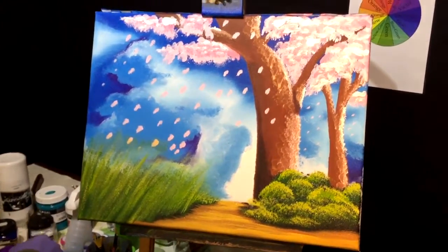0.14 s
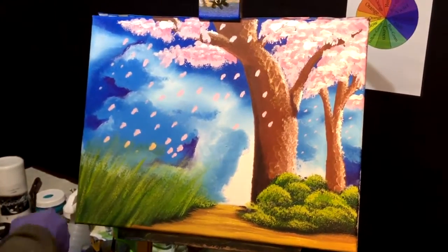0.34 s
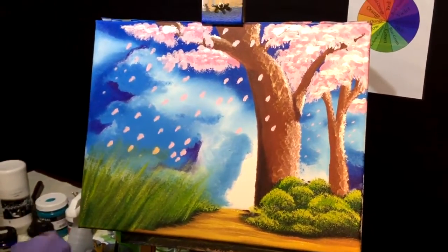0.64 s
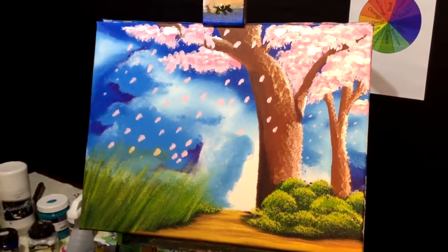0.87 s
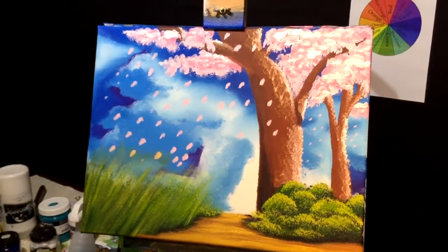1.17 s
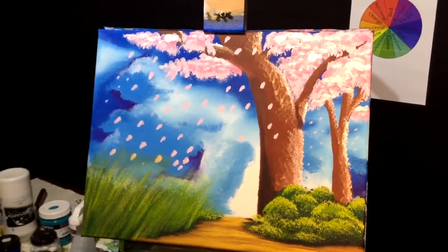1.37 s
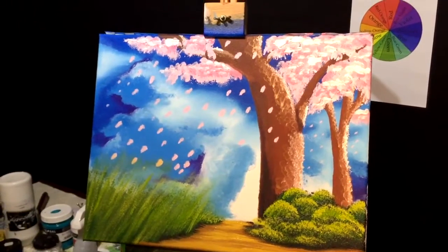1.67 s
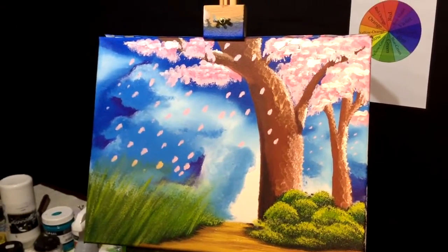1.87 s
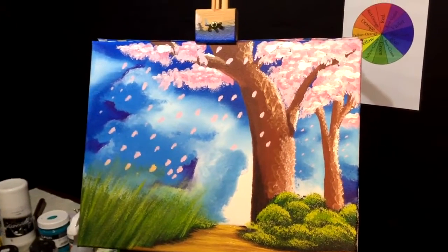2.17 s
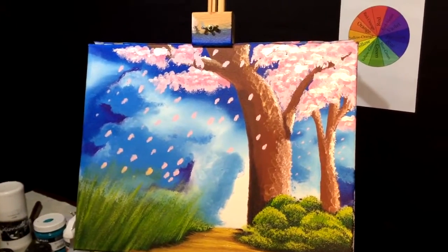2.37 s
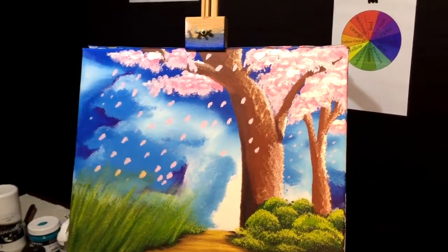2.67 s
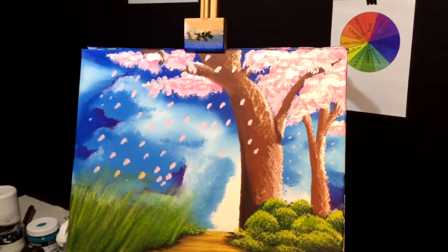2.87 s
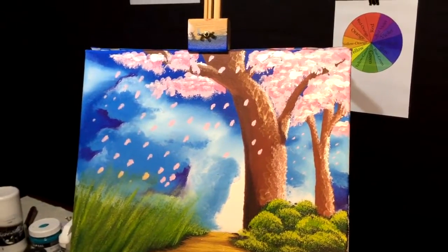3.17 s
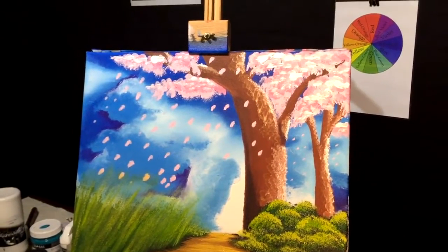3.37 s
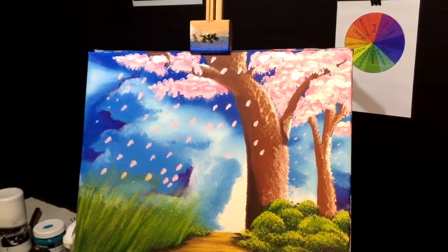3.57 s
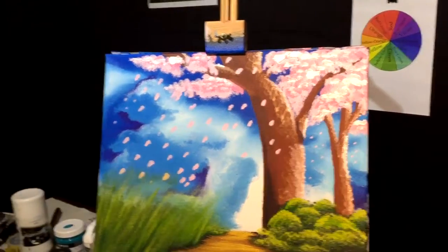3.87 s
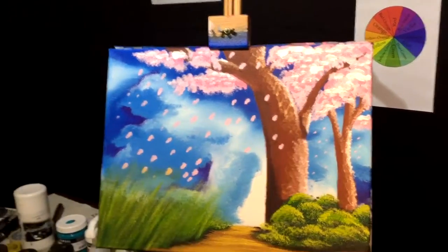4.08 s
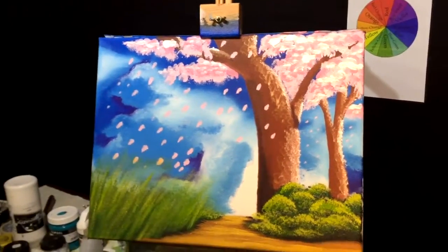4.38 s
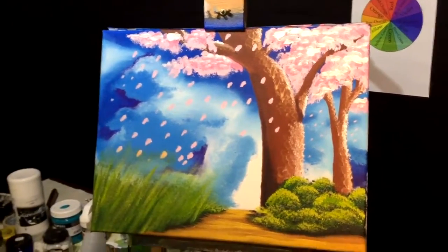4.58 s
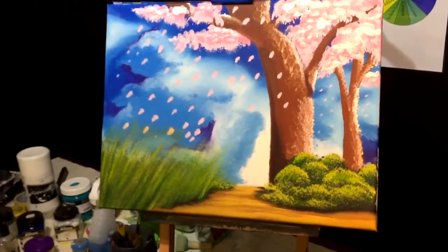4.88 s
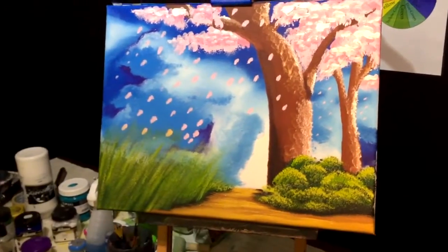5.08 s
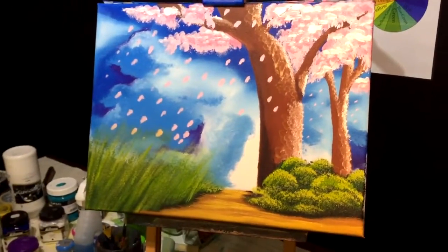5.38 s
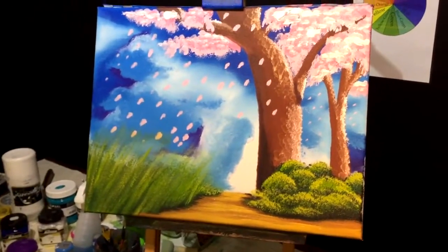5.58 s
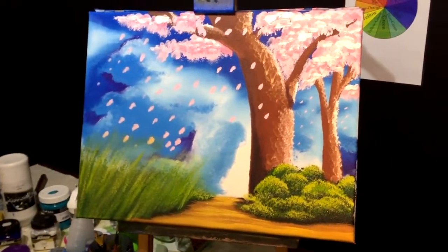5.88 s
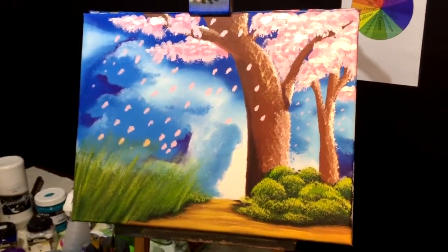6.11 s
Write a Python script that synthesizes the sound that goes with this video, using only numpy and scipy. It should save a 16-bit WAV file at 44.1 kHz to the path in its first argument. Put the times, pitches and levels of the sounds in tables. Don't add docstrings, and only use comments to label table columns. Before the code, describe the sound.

Brush rinsed in a small jar with light clinks, bubbling plops and quick swishes, two sharp woody knocks, then dull objects set down indoors.

```python
import sys
import numpy as np
from scipy import signal
from scipy.fft import rfft, irfft
from scipy.io import wavfile
from scipy.ndimage import uniform_filter1d, minimum_filter1d

SR = 44100
rng = np.random.default_rng(int(sys.argv[2]) if len(sys.argv) > 2 else 0)


def store_pcm(level_fs):
    pcm = np.round(np.clip(level_fs, -1, 1) * 32767).astype(np.int16)
    wavfile.write(sys.argv[1], SR, np.atleast_2d(pcm).T)


def gain_from_decibels(decibels):
    exponent = np.asarray(decibels, float) / 20
    return 10 ** exponent


N = 275448


def at_hz(points, hz):
    table_hz, value = np.transpose(points)
    return np.interp(np.log(hz + 1), np.log(table_hz), value)


def add(out, s, sound):
    i = round(s * SR)
    out[i:i + len(sound)] += sound[:N - i]


def coloured(x, spectrum, tilt_db=0):
    hz = np.fft.rfftfreq(8192, 1 / SR)
    level_db = at_hz(spectrum, hz) + tilt_db * np.log2(hz / 1000 + .05)
    cepstrum = irfft(np.log(gain_from_decibels(level_db)))
    cepstrum[1:4096] *= 2
    cepstrum[4097:] = 0
    kernel = irfft(np.exp(rfft(cepstrum)))
    return signal.fftconvolve(x, kernel / np.sqrt(np.sum(kernel ** 2)))[:len(x)]


def ring(clicks, hz, t60):
    r, w = gain_from_decibels(-60 / (t60 * SR)), 2 * np.pi * hz / SR
    return signal.lfilter([0, np.sin(w)], [1, -2 * r * np.cos(w), r * r], clicks + 1e-18)


def blows(events, colour, modes, clatter_db, ring_db, swell_cycles, rise_s, unrest):
    longest_ring_s = .55
    crowded_hz = 700
    in_step_s = 0.033
    out, t = np.zeros(N), np.arange(SR * 3 // 4) / SR
    hz, level_db, t60 = np.transpose(modes)[:, :, None]
    swell = 1 - np.exp(-t * hz / swell_cycles)
    drift = signal.resample(rng.standard_normal((len(modes), 100)), len(t), axis=1)
    beats = 1 + unrest * np.minimum(hz / crowded_hz, 1) * np.minimum(t / in_step_s, 1) * drift
    decay = gain_from_decibels(level_db - 60 * t / np.minimum(t60, longest_ring_s))
    body = np.sum(decay * swell * beats * np.sin(2 * np.pi * hz * t), axis=0)
    noises = rng.standard_normal((len(events), len(t)))
    for (s, db, clatter_t60, tilt_db, struck_db), noise in zip(events, noises):
        shape = gain_from_decibels(db + clatter_db - 60 * t / clatter_t60) * np.minimum(t / rise_s, 1)
        clatter = coloured(shape * noise, colour, tilt_db)
        add(out, s, clatter * np.sqrt(np.sum(shape ** 2) / np.sum(clatter ** 2)))
        add(out, s, gain_from_decibels(db + ring_db + struck_db) * body)
    return out


def blips(events, unrest):
    out, t = np.zeros(N), np.arange(SR // 5) / SR
    noises = rng.standard_normal((len(events), 2, len(t)))
    for (s, db, hz, rise, t60, wobble_hz), noise in zip(events, noises):
        phase = 2 * np.pi * np.cumsum(hz * 2 ** (rise * np.minimum(t / t60, .6))) / SR
        wobble = signal.lfilter(*signal.butter(2, wobble_hz, fs=SR), noise)
        along, across = wobble * unrest * np.sqrt(SR / wobble_hz / 2)
        envelope = gain_from_decibels(db - 60 * t / t60) * np.minimum(t / 0.0038, 1)
        add(out, s, envelope * ((1 + along) * np.sin(phase) + across * np.cos(phase)))
    return out


def pings(events):
    rise_cycles = 1.2
    out, t = np.zeros(N), np.arange(SR // 4) / SR
    for s, db, hz, t60 in events:
        swell = 1 - np.exp(-t * hz / rise_cycles)
        add(out, s, gain_from_decibels(db - 60 * t / t60) * swell * np.sin(2 * np.pi * hz * t))
    return out


# frequency in Hz, level in dB per Hz.
HUSH = [(15, -60.5), (25, -20.5), (86, -1.5), (156, -6.5), (188, -11.5), (379, -12.5), (411, -17),
        (553, -17), (898, -19.5), (1500, -20), (1670, -19.5), (1810, -19), (3550, -23), (15600, -34)]


def room_hush():
    return gain_from_decibels(-67.5) * coloured(rng.standard_normal(N), HUSH)


def fizz(grains_per_s, uneven_db, cycles):
    size = gain_from_decibels(uneven_db * rng.exponential(1, N))
    grains = (rng.random(N) < grains_per_s / SR) * size * rng.choice([-1, 1], N)
    pitches, dealt = np.geomspace(120, 15000, 24), rng.integers(0, 24, N)
    rings = sum(ring(grains * (dealt == k), hz, cycles / hz) * hz for k, hz in enumerate(pitches))
    return rings / rings.std()


# centre in seconds, level in dB rms, half length in seconds, tilt in dB per octave.
STROKES = [(-0.001, -46, 0.056, -7.5), (0.093, -51.5, 0.045, -2.5), (0.198, -51, 0.028, -6.5),
           (0.3, -72.5, 0.21, 12), (0.692, -43.5, 0.011, 1), (1.25, -73, 0.015, -4),
           (1.486, -56.5, 0.0034, 8), (1.582, -70.5, 0.058, 0), (1.692, -69, 0.014, -7),
           (1.33, -77, .03, -4), (1.525, -80, 0.034, -4), (2.29, -69, 0.02, 7), (2.931, -64, 0.12, -3),
           (4.103, -63.5, 0.014, -11), (4.484, -46, 0.015, -9.5), (4.527, -66.5, 0.05, -1),
           (4.723, -72.5, 0.17, 0), (4.978, -62.5, 0.01, -1.5), (5.264, -56.5, 0.0056, 0),
           (5.319, -67, 0.042, 1.5), (5.419, -68, 0.053, 7.5), (5.468, -67, 0.0061, -4),
           (6.245, -42.5, 0.018, -11)]
# centre in seconds, level in dB rms.
SWEEPS = [
    (1.223, -66),
    (1.46, -62),
    (1.668, -56.5),
    (1.868, -56),
    (2.053, -59),
    (2.234, -67),
]
# frequency in Hz, level in dB per Hz.
STROKE_COLOUR = [(47, -36.5), (80, -12.5), (409, -6.5), (544, -15), (903, -1.5), (1290, -8), (2000, -4.5),
                 (2330, -8), (4130, -9.5), (5040, -13.5), (15500, -28)]


def strokes(smooth_share):
    half_s, usual_tilt_db, harder_brighter, usual_db = 0.019, 0.5, 0.42, -58.5
    film = fizz(grains_per_s=6500, uneven_db=0.0, cycles=10)
    grains = coloured(film + smooth_share * rng.standard_normal(N), STROKE_COLOUR)
    out, size = np.zeros(N), SR // 2
    sweeps = [(s, db, half_s, usual_tilt_db + harder_brighter * (db - usual_db)) for s, db in SWEEPS]
    for s, db, half, tilt_db in list(STROKES) + sweeps:
        i = max(round(s * SR) - size // 2, 0)
        t = np.arange(i, min(i + size, N)) / SR
        tilt = gain_from_decibels(tilt_db * np.log2(np.fft.rfftfreq(len(t), 1 / SR) / 2000 + 0.055))
        piece = irfft(rfft(grains[i:i + size]) * tilt, len(t))
        out[i:i + size] += gain_from_decibels(db) * np.exp(-((t - s) / half) ** 2) * piece / piece.std()
    return out


# start in seconds, peak in dB, clatter t60 in seconds, tilt in dB per octave, ring in dB.
JAR_TAPS = [
    (.006, -38.5, 0.031, -8.5, 16.5),
    (.015, -45, 0.03, 11.5, -4),
    (.0745, -29.5, 0.045, 7.5, -0.5),
    (.096, -36.5, 0.039, -3.5, 6),
    (.112, -36.5, 0.018, 0, 11),
]
# frequency in Hz, level in dB per Hz.
TAP_COLOUR = [(47, -27), (80, -5), (1080, 3.5), (1710, -1), (2180, 4.5), (2600, -8), (3100, -6),
              (6280, -41), (13000, -58), (15500, -51)]
# frequency in Hz, level in dB, t60 in seconds.
JAR_WET = [(144, -24, .2), (211, -5, 0.27), (567, 7, 0.074), (700, -17, 0.072), (1026, 2.5, 0.14),
           (2050, -17, 0.12), (2290, -26, 0.11), (3080, -28, 0.05)]


def jar_taps():
    return blows(JAR_TAPS, TAP_COLOUR, JAR_WET, clatter_db=0.0, ring_db=-23.0, swell_cycles=2.2,
                 rise_s=0.00042, unrest=0.35)


# start in seconds, peak in dB, pitch in Hz, t60 in seconds.
PINGS = [(.007, -32, 1133, 0.03), (.0135, -38, 1910, 0.026), (.015, -41, 2280, 0.089),
         (.015, -45, 3300, .03), (.0745, -28.5, 2300, .025), (.077, -38, 3130, .035),
         (.0748, -38.5, 4790, .025), (.084, -42, 4100, .02), (.0755, -37, 1093, .04),
         (.096, -37, 1250, .02), (.098, -41, 2110, .03), (.1115, -41, 1950, .04), (.5950, -20, 2410, .014),
         (.5955, -33.5, 3100, 0.034), (.5965, -28, 505, .03), (.6000, -26.5, 1250, 0.062),
         (.602, -42, 2090, .06), (2.5140, -23, 1860, .03), (2.5152, -34, 2760, .015),
         (2.5160, -24, 1420, .04), (2.5197, -8, 803, 0.012), (2.5200, -21.5, 1054, .1),
         (2.5345, -18.5, 880, .03), (2.5395, -19.5, 810, .04), (2.556, -30.5, 286, .1),
         (2.6608, -21.5, 4233, 0.02), (2.6608, -23, 3480, .03), (2.6610, -23, 2827, .05),
         (2.6612, -10, 1194, .03), (2.6635, -19.5, 2030, 0.031), (2.664, -22.5, 1396, .07),
         (2.6660, -11.5, 700.5, 0.069), (2.6665, -11.5, 1145, 0.03), (2.6815, -23, 944, .04),
         (2.716, -37, 288, .15), (2.712, -38, 582.6, 0.16), (4.940, -25, 217.5, 0.14),
         (5.005, -42, 227, 0.23), (5.275, -34, 212.7, .12), (5.243, -45.5, 606, 0.042),
         (5.316, -40.5, 666, 0.048), (5.35, -42, 241, .2), (6.224, -33.5, 145, .1), (6.2335, -27, 271, .04),
         (6.2335, -32.5, 646, .015), (6.227, -40, 420, .015), (6.234, -47.5, 1250, .03),
         (6.237, -61.5, 3180, .04), (6.241, -35, 745, .03), (6.24, -52, 2220, .04)]


def contact_tones():
    return pings(PINGS)


# start in seconds, peak in dB, clatter t60 in seconds, tilt in dB per octave, ring in dB.
WASHES = [(.0746, -46, 0.0063, -18, -40), (.08, -39, 0.17, -5, -40), (.5948, -37, 0.0078, 4, -40),
          (.602, -40.5, 0.39, -4, -39), (2.522, -37.5, .3, -7.5, -38.5),
          (2.6607, -17.5, 0.0055, 4.5, -41.5), (2.668, -32, 0.11, 0.5, -39.5),
          (2.69, -37.5, 0.49, -2, -39.5), (5.257, -53, 0.028, 9.5, -40), (1.44, -66, 0.47, -5, -43),
          (1.62, -71.5, 0.33, -4, -42)]
# frequency in Hz, level in dB per Hz.
WASH_COLOUR = [(300, -25), (700, -1.5), (1200, 0.5), (2100, -1), (3500, -7.5), (6000, -13), (9000, -22),
               (15500, -39.5)]
# frequency in Hz, level in dB, t60 in seconds.
POT = [(210.5, 0, 0.28), (292, -9, 0.093), (790, -8.5, .15), (1370, -6.5, 0.2), (1990, -8.5, 0.15),
       (2400, -12.5, .2), (3000, -17.5, .2), (3580, -15, 0.24), (4200, -21.5, .15)]


def noise_washes():
    return blows(WASHES, WASH_COLOUR, POT, clatter_db=-2, ring_db=-9.5, swell_cycles=3,
                 rise_s=.0004, unrest=.3)


# start in seconds, peak in dB, pitch in Hz, t60 in seconds.
PLOPS_DEEP = [(.10, -44.5, 700, 0.21), (.16, -42.5, 610, 0.1), (.184, -31.5, 956, 0.07),
              (.196, -31.5, 1045, 0.026), (.21, -45.5, 2050, 0.053), (.21, -45, 970, 0.081),
              (.228, -46, 933, 0.061), (.19, -48, 1675, .06), (.2, -42, 1340, 0.055),
              (.265, -58, 1224, 0.078), (.12, -52, 2074, 0.22), (.241, -44, 1204, 0.063),
              (.308, -63, 2030, 0.046), (1.214, -61, 1664, 0.14), (1.345, -49.5, 1480, 0.044),
              (1.396, -51, 1580, 0.035), (1.451, -55.5, 1516, 0.094), (1.483, -49, 760, 0.043),
              (1.510, -54, 2070, .03), (1.578, -46, 1960, 0.1), (1.628, -54, 1444, 0.23),
              (1.657, -39.5, 1660, 0.012), (1.667, -47, 1547, 0.1), (1.685, -48.5, 2050, 0.051),
              (1.80, -69, 2020, 0.19), (1.455, -63, 389, 0.18), (1.862, -61.5, 398, 0.089),
              (2.284, -62, 1650, 0.084), (2.335, -49.5, 2090, 0.037)]
# start in seconds, peak in dB, pitch in Hz, rise in octaves, t60 in seconds.
CLIMBERS = [
    (.143, -41.5, 955, 0.3, 0.28),
    (0.187, -34.5, 1400, 0.95, 0.047),
    (1.308, -51, 1098, 1.7, 0.14),
    (1.785, -56, 1360, 0.15, 0.031),
    (5.492, -60.5, 1230, 0.3, 0.15),
]
# start in seconds, peak in dB, pitch in Hz.
SPRAY = [(0.158, -51, 3800), (0.682, -40.5, 3080), (1.313, -56.5, 2900), (1.447, -58, 9800),
         (1.483, -55.5, 2980), (1.578, -51, 5400), (1.655, -49.5, 8570), (1.697, -52.5, 5200),
         (1.847, -53, 3730), (1.869, -56, 4200), (2.039, -59, 2860), (2.051, -58, 2750), (1.455, -63, 3300),
         (2.283, -64, 6136), (5.414, -58.5, 6700)]


def bubbles():
    rise_oct, water_share, climb_share = 0.094, 0.097, 0.12
    spray_t60_s, spray_share = 0.051, 0.061
    jar_air = [(s - 0.0017, db + 2.5, 1005, 0.059) for s, db in SWEEPS]
    steady = list(PLOPS_DEEP) + jar_air
    rows = [(s, db, hz, rise_oct, t60, water_share * hz) for s, db, hz, t60 in steady]
    rows += [(s, db, hz, rise_oct, spray_t60_s, spray_share * hz) for s, db, hz in SPRAY]
    rows += [(*row, climb_share * row[2]) for row in CLIMBERS]
    return blips(rows, unrest=0.78)


# start in seconds,
# peak in dB, pitch in Hz, t60 in seconds.
BEADS = [(.15, -47.5, 2050, 0.1), (.184, -30.5, 1183, 0.048), (.196, -39, 1670, 0.031),
         (.203, -45, 1880, .03), (.222, -54, 1920, 0.055), (.26, -54, 1230, .06), (.285, -57, 1210, 0.045),
         (.311, -48.5, 2050, 0.053), (.314, -48, 1130, 0.041), (1.397, -43, 1516, 0.047),
         (1.483, -51, 1470, 0.036), (1.53, -57, 1000, 0.054), (1.578, -38.5, 1940, 0.019),
         (1.583, -56, 2050, 0.11), (1.63, -62, 1480, 0.036), (1.656, -50.5, 2750, .03),
         (1.668, -48.5, 1140, 0.075), (1.451, -55.5, 972, .08), (1.322, -57, 1710, 0.064),
         (4.358, -69, 610, 0.02)]


def beads():
    return pings(BEADS)


# start in seconds, peak in dB, clatter t60 in seconds, tilt in dB per octave, ring in dB.
JAR_RAP = [
    (.595, -22, 0.022, 3, -4),
    (.600, -27.5, 0.064, -6.5, -3.5),
    (.684, -59, 0.026, 0, -20),
    (.692, -68, 0.011, 12, -19),
]
# frequency in Hz, level in dB per Hz.
JAR_COLOUR = [(47, -53), (80, -30), (263, -13.5), (965, -12), (1260, 6.5), (1670, 0.5), (2000, 9),
              (2720, -8), (3030, -5.5), (4720, -13), (9340, -16), (15500, -37)]
# frequency in Hz, level in dB, t60 in seconds.
JAR = [(131.4, -4.5, 0.35), (212, 0.5, 0.081), (494, 12, 0.016), (817, -8.5, 0.11), (1202, -10, 0.46),
       (1250, -8.5, 0.4), (1342, -18, 0.51), (1960, -29, 0.14), (2300, -26, 0.29), (2750, -46, 0.2),
       (2900, 5, 0.074)]


def jar_rap():
    return blows(JAR_RAP, JAR_COLOUR, JAR, clatter_db=-1.0, ring_db=-8.5, swell_cycles=0.58,
                 rise_s=0.00014, unrest=0.64)


# start in seconds, peak in dB, clatter t60 in seconds, tilt in dB per octave, ring in dB.
SCRAPES = [
    (4.473, -59, 0.23, -3.5, -31),
    (4.51, -65, 0.17, 4, -28),
    (1.307, -57, .02, 8, -30),
    (1.394, -56.5, 0.025, 1, -32),
    (1.482, -50, .015, -1, -30),
    (1.656, -49, .015, 1, -30),
    (5.459, -57.5, 0.043, 1.5, -37),
]
# frequency in Hz, level in dB per Hz.
SCRAPE_COLOUR = [(300, -18), (800, 2), (1400, 0), (2400, 7), (2800, -4), (3600, 6), (4400, -20),
                 (5200, -32)]


def scrapes():
    return blows(SCRAPES, SCRAPE_COLOUR, POT, clatter_db=-3.5, ring_db=-14, swell_cycles=3,
                 rise_s=0.00052, unrest=.3)


# start in seconds, peak in dB, clatter t60 in seconds, tilt in dB per octave, ring in dB.
SOFT_KNOCK = [
    (2.514, -22, 0.03, 5.5, 1.5),
    (2.520, -9.5, 0.01, -2.5, 1),
    (2.535, -23.5, 0.023, -4.5, -5),
    (2.562, -27, 0.025, -11, -5),
]
# frequency in Hz, level in dB per Hz.
SOFT_COLOUR = [(40, -60.5), (65, -25.5), (390, -15), (540, -23), (750, -0.5), (1070, -10.5), (1900, -16.5),
               (2300, -24.5), (3040, -26), (4520, -47.5), (7050, -52), (11000, -70), (16000, -100)]
# frequency in Hz, level in dB, t60 in seconds.
EDGE_SOFT = [(74.5, -15, 0.59), (295, -8.5, .2), (393.4, -3.5, 0.25), (694.5, -6, 0.15), (730, -7, 0.66),
             (775, -0.5, 0.075), (832, -5, 0.3), (888, -2.5, 0.24), (1020, -14, .3), (1093, -6, 0.14),
             (1033, -5.5, 0.24), (1440, -21, 0.22), (1522, -13.5, 0.1), (1960, -20, 0.4),
             (2080, -21.5, .35), (2760, -32, .15)]


def soft_knock():
    return blows(SOFT_KNOCK, SOFT_COLOUR, EDGE_SOFT, clatter_db=1, ring_db=-21.5, swell_cycles=3.3,
                 rise_s=.0015, unrest=0.71)


# start in seconds, peak in dB, pitch in
# Hz, t60 in seconds.
NUDGES = [(4.213, -47.5, 190, 0.051), (4.215, -55, 560, 0.044), (4.32, -66, 2200, .1),
          (4.356, -57.5, 567, 0.065), (4.376, -52, 147, 0.13), (4.380, -55, 474, 0.087),
          (4.425, -59, 685, 0.071), (4.53, -50, 205, .2), (4.575, -63, 2000, .15), (4.650, -31, 463, 0.017),
          (4.655, -60.5, 192, 0.59), (4.69, -65, 2150, .4), (4.74, -64, 2000, .3), (4.978, -55, 947, 0.09),
          (5.00, -51, 472, 0.33), (5.255, -58, 1600, 0.16), (5.317, -59, 2280, .08)]
# start in seconds, peak in dB, pitch in Hz, change in octaves, t60 in seconds.
SAGS = [
    (2.5195, -21, 697, -0.25, 0.046),
    (4.402, -31, 340, -1.7, 0.013),
    (4.410, -42.5, 115, -1.5, 0.048),
    (4.474, -47.5, 757, 0.047, 0.1),
]
# start in seconds, peak in dB.
POT_LANDS = [
    (4.476, -49),
    (4.498, -51),
    (4.518, -54.5),
    (4.545, -62),
]


def bumps():
    pot = [(s, db + level_db, hz, t60) for s, db in POT_LANDS for hz, level_db, t60 in POT]
    rows = [(s, db, hz, 0, t60, 50 + 0.11 * hz) for s, db, hz, t60 in list(NUDGES) + pot]
    rows += [(*row, 45) for row in SAGS]
    return blips(rows, unrest=0.58)


# start in seconds, peak in dB, clatter t60 in seconds, tilt in dB per octave, ring in dB.
HARD_KNOCK = [
    (2.661, -13, 0.03, 4, 9),
    (2.666, -15, 0.03, -2.5, 3),
    (2.682, -28.5, 0.011, -3.5, 8),
    (2.72, -28, 0.055, -9.5, 3.7),
]
# frequency in Hz, level in dB per Hz.
HARD_COLOUR = [(40, -59.5), (65, -28.5), (380, -18), (560, -17.5), (700, -1), (1150, -0.5), (1650, -10),
               (2000, -7.5), (2400, -14), (3100, -17.5), (4250, -20), (5000, -22.5), (15500, -52)]
# frequency in Hz, level in dB, t60 in seconds.
EDGE_HARD = [(71.9, -13, 0.56), (128.8, 0, 0.38), (217.9, -14.5, 0.64), (378, -2.5, 0.3), (700, -1, 0.42),
             (724, -6, .44), (807.6, -8, .3), (886, -9, 0.3), (1045, -5, .5), (1087, -4, 0.56),
             (1168, -9.5, 0.35), (1250, -11.5, .35), (1400, -8, 0.25), (1805, -12.5, .25), (1940, -16, .5),
             (1990, -15, 0.55), (2042, -12.5, 0.5), (2120, -16.5, 0.74), (2280, -17.5, 0.28),
             (2650, -15, 0.22), (2862, -15, 0.25), (3200, -25, 0.25), (3455, -26.5, .3), (3830, -28, .4),
             (4650, -30, .3)]


def hard_knock():
    return blows(HARD_KNOCK, HARD_COLOUR, EDGE_HARD, clatter_db=-1.5, ring_db=-29.0, swell_cycles=1.7,
                 rise_s=0.00033, unrest=1.0)


# start in seconds, peak in dB, clatter t60 in seconds, tilt in dB per octave, ring in dB.
THUDS = [
    (4.903, -34.5, 0.13, -4.5, 5.5),
    (4.976, -41.5, 0.11, 7, -35),
    (5.240, -33.5, 0.22, -7.5, 6),
    (5.258, -38.5, 0.016, 29, -9),
    (5.315, -30, 0.093, -3.5, -19.5),
    (6.226, -39, 0.15, -3, -25.5),
]
# frequency in Hz, level in dB per Hz.
THUD_COLOUR = [(29, -71.5), (50, -32), (142, -45), (221, -30.5), (331, -8), (418, -28), (495, -21),
               (639, -15.5), (1230, -39), (3650, -59), (8000, -91), (10400, -101), (17600, -120)]
# frequency in Hz, level in dB, t60 in seconds.
TABLE_TOP = [(73.7, -18, 0.35), (136.5, -11.5, 0.18), (191, -16, 0.62), (210.6, -2, 0.22),
             (221, -3.5, 0.16), (247.5, -13, 0.46), (302.2, -14, 0.34), (412, -15, 0.29),
             (453.3, -24, 0.57), (625, -35, 0.24), (772, -37.5, 0.39)]


def table_thuds():
    return blows(THUDS, THUD_COLOUR, TABLE_TOP, clatter_db=-9.5, ring_db=2.0, swell_cycles=2.3,
                 rise_s=0.007, unrest=0.06)


# frequency in Hz, t60 in seconds.
ROOM_T60 = [(60, 0.52), (250, 0.68), (1000, 0.34), (3000, .32), (8000, 0.23), (15000, 0.016)]


def room(x):
    level_db, first_echo_s = -11.5, 0.005
    t, edges = np.arange(SR) / SR, 40 * 2 ** np.arange(0, 9, .5)
    echoes, white = 0, rng.standard_normal((2, SR))
    for k, (low, high) in enumerate(zip(edges, edges[1:])):
        band_filter = signal.butter(2, [low, high], "band", fs=SR, output="sos")
        band = signal.sosfilt(band_filter, white[k % 2])
        echoes = echoes + band * gain_from_decibels(-60 * t / at_hz(ROOM_T60, np.sqrt(low * high)))
    echoes = echoes * np.clip(t / first_echo_s - 1, 0, 1)
    return gain_from_decibels(level_db) * signal.fftconvolve(x, echoes / np.sqrt(np.sum(echoes ** 2)))[:N]


def scene():
    wood = jar_taps() + jar_rap() + soft_knock() + hard_knock()
    tones = contact_tones()
    thuds = table_thuds()
    water = bubbles() + beads() + strokes(smooth_share=1.8)
    pushes = bumps()
    echoes = room(wood + gain_from_decibels(-5.0) * tones + thuds + gain_from_decibels(-3.5) * water + gain_from_decibels(-7) * pushes)
    dry_noises = scrapes() + noise_washes()
    return (wood + tones + thuds + water + pushes + echoes + dry_noises + room_hush())[None]


def thinned(x, size, reach):
    masked_db, treble_bias_db, waver_db, attack_bonus_db = -55, 16, 6, 8
    s, frames = signal.stft(x, SR, window="cosine", nperseg=2 * size, noverlap=size)[1:]
    power = np.abs(frames[:, :size]) ** 2
    bands = power.reshape(1, 32, size // 32, -1).mean(axis=2)
    smooth = uniform_filter1d(power, size=max(size // 170, 1), axis=1)
    loudest = smooth.max(axis=1, keepdims=True)
    strongest = -minimum_filter1d(-loudest, size=reach, axis=2)
    attack = strongest > 100 * np.roll(strongest, 2, axis=2)
    height = np.arange(32)[:, None] / 23
    limit_db = masked_db + treble_bias_db * height - attack_bonus_db * (reach > 1)
    limit_db = limit_db + waver_db * rng.standard_normal(bands.shape) / reach
    frames[:, :size] *= np.repeat(bands > strongest * gain_from_decibels(2 * limit_db), size // 32, axis=1)
    kept = signal.istft(frames, window="cosine", nperseg=2 * size, noverlap=size)[1][:, :N]
    return kept, s, attack[0, 0]


def masked(x):
    slow, s, attack = thinned(x, size=1024, reach=1)
    quick = thinned(x, size=128, reach=17)[0]
    sudden = np.interp(np.arange(N) / SR, s, attack | np.roll(attack, -1))
    sudden = np.minimum(3 * sudden, 1)
    return sudden * quick + (1 - sudden) * slow


def low_pass(x):
    return signal.sosfilt(signal.butter(12, 16510, fs=SR, output="sos"), x)


def record(dry):
    thin = signal.sosfilt(signal.butter(2, 40.2, "high", fs=SR, output="sos"), dry)
    cut = signal.sosfilt(signal.cheby2(12, 50, 16500, fs=SR, output="sos"), thin)
    return low_pass(masked(cut))


dry = scene()
out = record(dry)
store_pcm(out)
```